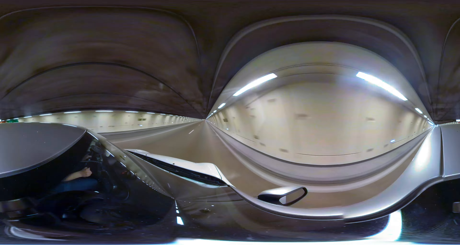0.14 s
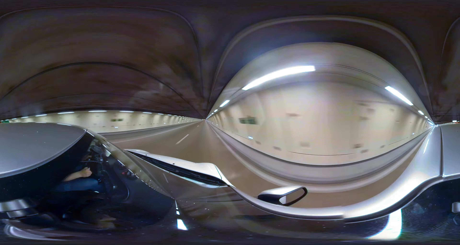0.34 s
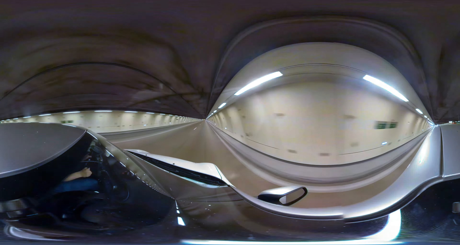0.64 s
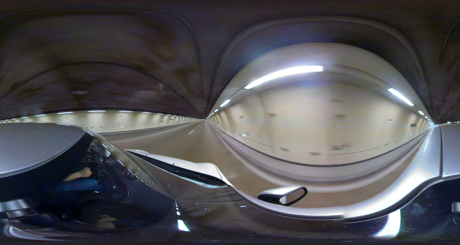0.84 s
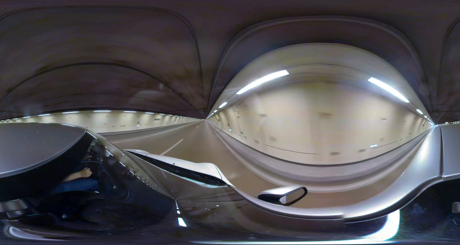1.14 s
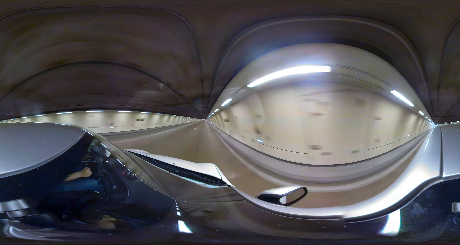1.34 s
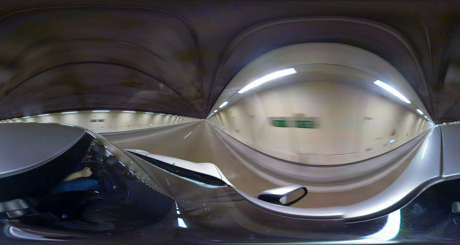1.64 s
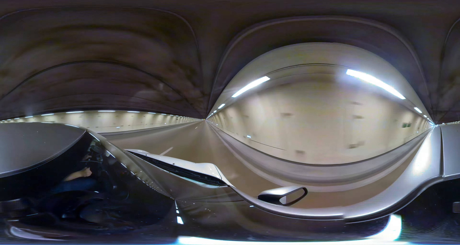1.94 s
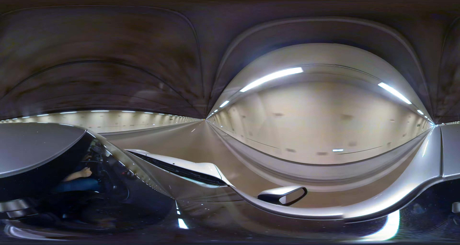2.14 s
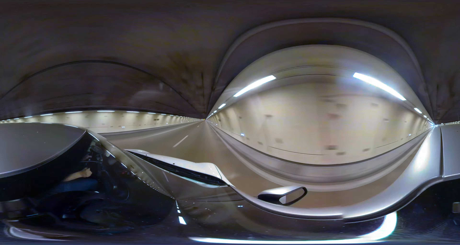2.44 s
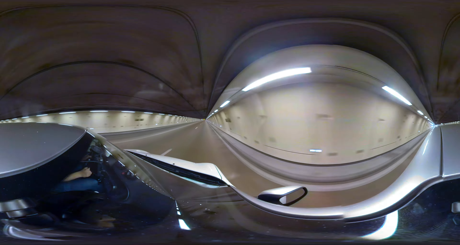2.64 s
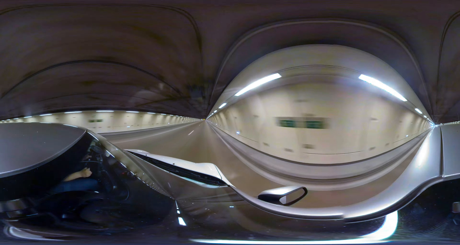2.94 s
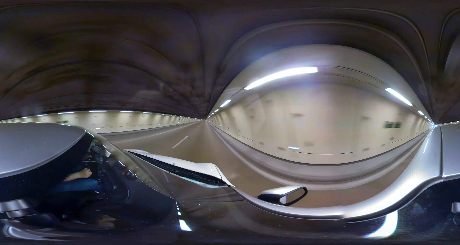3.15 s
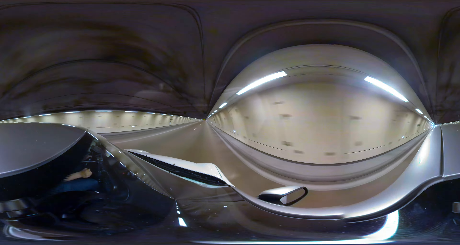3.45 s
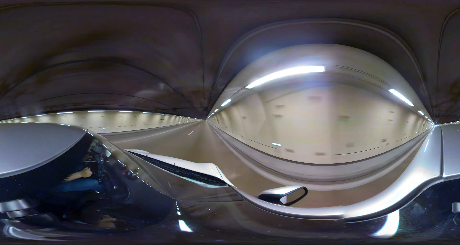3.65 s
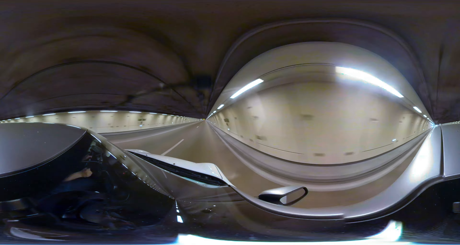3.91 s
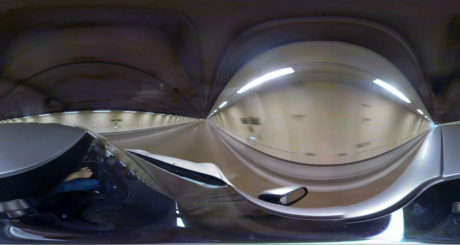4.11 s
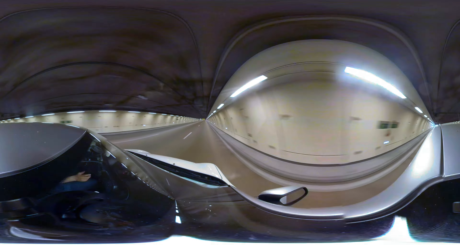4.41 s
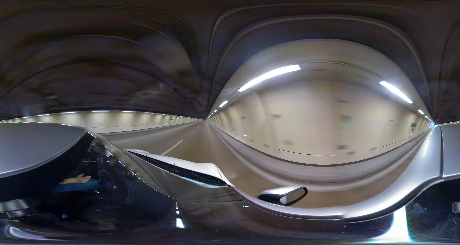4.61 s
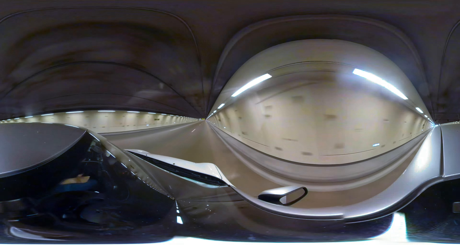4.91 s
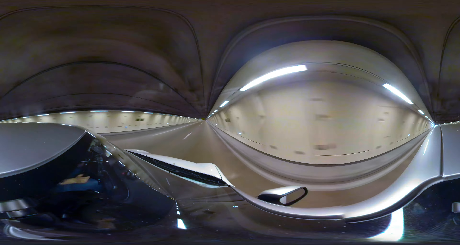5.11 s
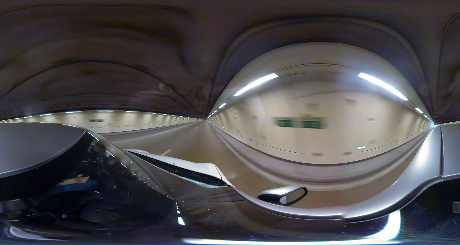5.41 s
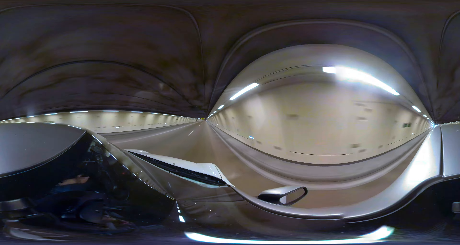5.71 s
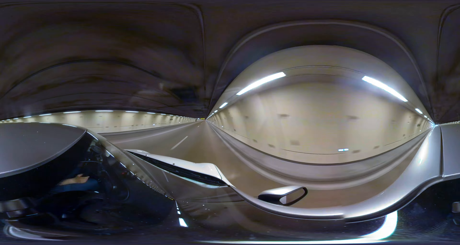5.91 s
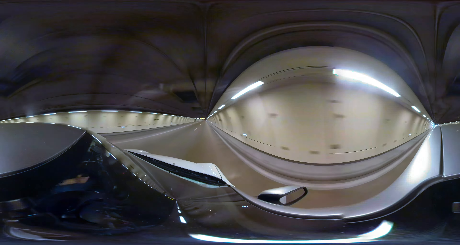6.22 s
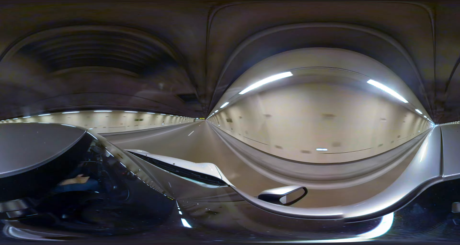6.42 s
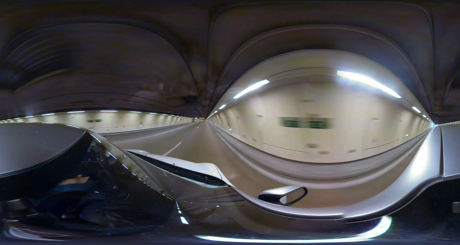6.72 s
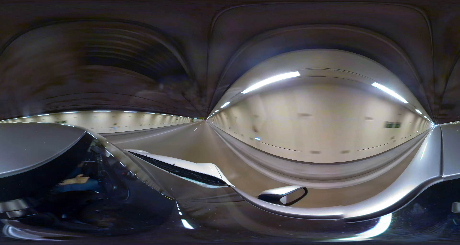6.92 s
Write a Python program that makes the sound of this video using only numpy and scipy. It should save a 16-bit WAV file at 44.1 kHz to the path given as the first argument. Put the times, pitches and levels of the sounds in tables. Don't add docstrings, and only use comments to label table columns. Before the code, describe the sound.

A small camera fixed outside a speeding car in a road tunnel takes heavy, fluttering low wind buffeting throughout. Beneath it are steady tyre roar, rushing air and a faint high whine that comes and goes. The air rush eases after two seconds; towards five the road roughens, with seam thumps, dry knocks and a few sharp grit ticks before an abrupt end.

```python
import sys
import numpy as np
from scipy import signal
from scipy.fft import rfft, irfft, next_fast_len
from scipy.io import wavfile
from scipy.ndimage import uniform_filter1d, map_coordinates

SR = 44100
rng = np.random.default_rng(int(sys.argv[2]) if len(sys.argv) > 2 else 0)


def dump(signal):
    limited = np.clip(np.atleast_2d(signal).T, -1, 1)
    pcm = np.round(limited * 32767).astype(np.int16)
    wavfile.write(sys.argv[1], SR, pcm)


def natural_amplitude(level_db):
    exponent = np.asarray(level_db, float) / 20
    return 10 ** exponent


N = 311346


def unit(x):
    return x / np.sqrt(np.mean(x ** 2) + 1e-20)


def curves(rows):
    s, *cols = np.transpose(rows)
    return [np.interp(np.arange(N) / SR, s, c) for c in cols]


def wobble(rate):
    knots = rng.standard_normal(int(N * rate / SR) + 4)
    return map_coordinates(knots, [np.arange(N) * rate / SR])


def filtered(x, response):
    m = next_fast_len(N + 8192)
    run_on = np.pad(x[:N], 4096, "reflect") * signal.windows.tukey(N + 8192, 8192 / (N + 8192))
    return irfft(rfft(run_on, m) * response(np.fft.rfftfreq(m, 1 / SR)), m)[4096:N + 4096]


def colour(points):
    f, db = np.transpose(points)
    return lambda hz: natural_amplitude(np.interp(np.log(hz + 1), np.log(f + 1), db))


def noise(response, patchy_db):
    z = signal.stft(rng.standard_normal(N + 512), nperseg=512)[2]
    field = uniform_filter1d(rng.standard_normal(z.shape), size=5, axis=0)
    field = uniform_filter1d(field, size=10, axis=1)
    patched = signal.istft(z * natural_amplitude(patchy_db * unit(field)), nperseg=512)[1][:N]
    return unit(filtered(patched, response))


def evened(x, size, depth):
    return unit(x / (np.abs(uniform_filter1d(x ** 2, size=size)) + 0.027) ** depth)


# (start [s], length [s], level [dB])
CRACKLES = [(.24, .04, -94), (.285, .042, -91), (.408, .04, -92), (.608, .038, -93), (1.093, .044, -94),
            (1.44, .04, -94), (1.615, .028, -94), (1.949, .034, -94), (2.03, .045, -93), (2.157, .047, -91),
            (2.472, .032, -92), (2.597, .071, -90), (2.84, .045, -91), (3.099, .063, -92), (3.195, .01, -92),
            (3.245, .05, -89), (3.845, .063, -93), (3.909, .045, -90), (4.035, .08, -92), (4.123, .042, -91),
            (4.347, .031, -93), (4.419, .047, -93), (4.503, .022, -94), (4.552, .044, -92), (4.795, .031, -92),
            (5.002, .037, -93), (5.208, .092, -91), (5.379, .043, -91), (5.462, .05, -92), (5.549, .048, -93),
            (5.723, .047, -93), (6.32, .044, -92), (6.638, .05, -90), (6.958, .049, -89)]


def top_crackle():
    t = np.arange(N) / SR
    ticks_hz, spiky_db, gain_db = 330, 4, 8
    gate = sum(natural_amplitude(db + gain_db) * (t > s) * (t < s + span) for s, span, db in CRACKLES)
    ticks = (rng.random(N) < ticks_hz / SR) * natural_amplitude(spiky_db * rng.standard_normal(N))
    ticks = ticks * np.sign(rng.standard_normal(N))
    return filtered(gate * unit(ticks), colour([(9000, -60), (11500, 0), (15700, -2), (16000, -60)]))


# (frequency [Hz], level [dB rms])
TONES = [(9426, -101), (9803, -92.5), (10180, -90.5), (10928, -95.5)]
# (start [s], length [s], level [dB])
SPELLS = [(0, .25, -70), (.3, .4, -68), (.86, .36, -69), (1.46, .3, -69), (1.76, .88, -67.5),
          (2.92, 0.8, -68.5), (4.1, .35, -69), (4.6, .14, -68.5), (4.8, .16, -70), (5.12, .2, -70),
          (5.44, .07, -68), (5.63, .3, -71), (6.08, .4, -68.5), (6.73, .4, -69)]


def whines():
    t = np.arange(N) / SR
    whine_hz, fade_s, between_db = 4322, 0.02, -78

    def edge(s):
        return 1 / (1 + np.exp(np.clip((s - t) / fade_s, -50, 50)))

    db = between_db + sum((top_db - between_db) * edge(s) * (1 - edge(s + span))
                          for s, span, top_db in SPELLS)
    turn = 2 * np.pi * np.cumsum(whine_hz + 3.8 * wobble(12)) / SR
    level_db = db + .5 + 1.2 * wobble(16) + 2.5 * wobble(35)
    whistle = natural_amplitude(level_db) * (np.sin(turn) + natural_amplitude(1) * np.sin(turn / 2))
    tones = sum(natural_amplitude(level + 3 * wobble(12)) * np.sin(2 * np.pi * np.cumsum(f + 6 * wobble(29)) / SR)
                for f, level in TONES)
    return np.sqrt(2) * (whistle + tones)


# (multiple of the ring [ratio], level [dB])
SHELL = [(.93, 0), (1, 0), (1.08, -2), (1.18, -6), (1.3, -10), (1.45, -18)]
# (time [s], peak level [dB], ring [Hz], t60 [s])
GRIT = [
    (5.2367, -50, 5500, .004),
    (5.3098, -35, 5000, .008),
    (5.6237, -36, 5300, .005),
    (5.6388, -49, 7400, .004),
    (6.1825, -42, 5400, .004),
    (6.3140, -52, 5600, .004),
    (6.5118, -53, 4900, .004),
    (6.967, -46, 6200, .004),
]


def grit():
    out, t = np.zeros(N + 2000), np.arange(2000) / SR
    for s, db, hz, t60 in GRIT:
        ring = sum(natural_amplitude(level) * np.sin(2 * np.pi * k * (hz * t + j * j / 5))
                   for j, (k, level) in enumerate(SHELL))
        crack = 0.15 * rng.standard_normal(len(t))
        out[round(s * SR):][:len(t)] += natural_amplitude(db - 5.0 - 60 * t / t60) * (ring + crack)
    return filtered(out[:N], lambda f: 1 / (1 + (4450 / (f + 1)) ** 20) / (1 + (f / 7600) ** 14))


# (frequency [Hz], level [dB per Hz])
RUSH = [(300, -30.5), (700, -12.5), (1300, 1.5), (1800, 1.5), (2200, -1.5), (3000, -8), (4000, -22),
        (6000, -54.5), (9000, -120)]
HISS = [(1500, -27), (3000, -3), (4000, -2), (5600, -9), (6500, -15.5), (7500, -17.5), (8300, -21.5),
        (9000, -28), (10200, -21.5), (11000, -28), (12000, -37), (12700, -38), (13000, -53.5),
        (16000, -52.5)]
# (time [s], rush level [dB])
AIRFLOW = [(0, -43.5), (.4, -42.5), (1.35, -44.5), (1.7, -41.5), (2.1, -47), (3.66, -47.5), (4.3, -47.5),
           (5.3, -52), (7.06, -48.5)]


def airflow(shared):
    rush_db, = curves(AIRFLOW)
    hiss_db = -58.5 + .05 * (rush_db - rush_db.mean()) + 0.23 * wobble(8.1)
    rush = natural_amplitude(rush_db + 0.82 + 0.27 * shared) * noise(colour(RUSH), patchy_db=0.9)
    return rush + natural_amplitude(hiss_db) * noise(colour(HISS), patchy_db=-1.0)


# (frequency [Hz], level [dB per Hz])
SEAM = [(150, -30.5), (330, 4), (500, 2.5), (900, -6), (1300, -15.5), (2200, -41.5), (4000, -78.5)]
# (time [s], thump level [dB], lift of the tyre roar [dB])
SEAMS = [(0.3, -31, 3.5), (0.87, -27.5, 4.5), (1.06, -24, 1), (1.54, -23, 5), (1.721, -21.5, 0.5),
         (1.9, -19, -0.5), (2.505, -21, 1.5), (2.747, -17, 5), (3.006, -23, -2.5), (3.195, -24, 4.5),
         (3.268, -25, 3.5), (3.53, -28, 1.5), (3.92, -26, 3), (4.15, -29, 2), (4.525, -28, 0.5),
         (4.654, -27, 2), (4.73, -16.5, 2), (5.03, -27, 1), (5.134, -28, 2.5), (5.23, -31, 3.5),
         (5.31, -20.5, 5), (5.514, -31, 2), (5.62, -16.5, 4), (5.81, -27, 2), (6.034, -18, 3.5),
         (6.082, -20, 2.5), (6.242, -15.5, 5.5), (6.41, -23.5, 2), (6.662, -23, 0.5), (6.8, -21, -4)]


def seam_thumps():
    t, length = np.arange(N) / SR, .016
    gate = sum(natural_amplitude(db) * np.exp(-2 * ((t - s - length / 2) / length) ** 2) for s, db, _ in SEAMS)
    return natural_amplitude(-13.5) * gate * noise(colour(SEAM), patchy_db=6.5)


# (time [s], level [dB], surface roughness [0-1])
TYRES = [(0, -38.5, 0.25), (.65, -39, 0), (.9, -37, 0.15), (1.3, -39, 0.08), (1.7, -37.5, 0), (2, -34, 0.3),
         (2.5, -36, 0.48), (2.9, -38, 0.28), (3.3, -37, 0), (3.9, -37.5, 0.22), (4.2, -36, 0.22),
         (4.8, -35.5, 0.6), (5.3, -34, 0.6), (5.6, -36, 0.68), (6.05, -33.5, 0.46), (6.25, -32, 0.44),
         (6.6, -34, 0.63), (7.06, -39, 0)]


def tyre_state():
    t, lift_s = np.arange(N) / SR, 0.022
    tyre_db, rough = curves(TYRES)
    lift_db = sum(db * np.exp(-2 * ((t - s) / lift_s) ** 2) for s, _, db in SEAMS)
    return tyre_db + lift_db, rough


# (frequency [Hz], level [dB per Hz])
DRONE = [(200, -44), (290, 0.5), (340, -2.5), (420, -5.5), (520, -11.5), (650, -22), (1000, -63.5)]


def drone(tyre_db):
    drone_db = -39.8 + 0.47 * (tyre_db - tyre_db.mean()) + wobble(14)
    return natural_amplitude(drone_db) * noise(colour(DRONE), patchy_db=1.4)


# (time [s], peak level [dB], frequency [Hz])
KNOCKS = [(.032, -25, 1020), (1.767, -23, 550), (2.7445, -22, 700), (2.7515, -26, 850), (2.852, -26, 830),
          (3.006, -28, 710), (3.192, -24, 640), (3.5305, -23, 640), (3.572, -25, 740), (4.734, -22, 800),
          (5.522, -23, 860), (6.039, -18, 800), (6.083, -19, 880), (6.251, -14.5, 850), (6.393, -21, 700)]


def knocks():
    t, out, lull = np.arange(N) / SR, np.zeros(N), np.ones(N)
    decay_cycles, gain_db, lull_s = 1.3, 2, .006
    for s, db, hz in KNOCKS:
        span = slice(round((s - .02) * SR), round((s + .02) * SR))
        cycles = np.maximum(t[span] - s, 0) * hz
        out[span] -= natural_amplitude(db + gain_db) * np.exp(-cycles / decay_cycles) * np.sin(2 * np.pi * cycles)
        lull[span] *= 1 - .7 * np.exp(-((t[span] - s + lull_s / 2) / lull_s) ** 2)
    return filtered(out, lambda f: 1 / (1 + (f / 2200) ** 6)), lull


# (time [s], frequency [Hz], peak level [dB])
SLAPS = [(0.889, 521, -33), (2.192, 1400, -35), (2.467, 927, -28), (2.53, 1400, -34), (3.479, 480, -32),
         (4.477, 850, -26), (4.588, 927, -27), (4.662, 1187, -29), (4.918, 854, -29), (5.033, 920, -27.5),
         (5.136, 927, -28), (5.22, 1093, -28), (5.258, 1187, -29), (5.304, 480, -39), (5.305, 1170, -27),
         (5.463, 1007, -27), (5.641, 1180, -29), (5.753, 1187, -30), (5.824, 910, -26), (5.943, 570, -28),
         (6.0, 1300, -31), (6.042, 1187, -37), (6.108, 1007, -27), (6.189, 1007, -27), (6.228, 565, -33),
         (6.26, 900, -28), (6.221, 1000, -25), (6.294, 1007, -27), (6.359, 521, -37), (6.373, 1289, -32),
         (6.416, 1007, -30), (6.527, 1093, -32)]


def slaps():
    t, out, near = np.arange(N) / SR, np.zeros(N), np.zeros(N)
    rise_cycles, fall_cycles, gain_db, dip = 1.1, 2.5, 1.5, 0.32
    for (s, hz, db), phase in zip(SLAPS, rng.random((len(SLAPS), 1))):
        span = slice(max(round((s - .03) * SR), 0), round((s + .04) * SR))
        cycles = (t[span] - s) * hz
        shape = np.exp(-.5 * (cycles / np.where(cycles < 0, rise_cycles, fall_cycles)) ** 2)
        out[span] += natural_amplitude(db + gain_db) * shape * np.sin(2 * np.pi * (cycles + phase))
        near[span] += shape
    return out, 1 - dip * np.clip(near, 0, 1)


def ridge():
    hz = 870 + 70 * wobble(5) + 60 * wobble(60)
    return unit(natural_amplitude(2.7 * wobble(40)) * np.sin(2 * np.pi * np.cumsum(hz) / SR))


# (frequency [Hz], width [Hz], level [dB])
TREAD = [(570, 370, -8.5), (744, 556, 3), (1210, 650, -8.5)]


def tyres(tyre_db, rough, shared):
    def tread(f):
        power = sum(natural_amplitude(2 * db) / (1 + (2 * (f - c) / w) ** 2) ** 2 for c, w, db in TREAD)
        return np.sqrt(power / (1 + (f / 3000) ** 6))

    roar = evened(noise(tread, patchy_db=0.04), size=300, depth=.08)
    coarse = unit(filtered(roar, lambda f: f ** 2 / (f ** 2 + 1600 ** 2)))
    gain = natural_amplitude(tyre_db + 0.46 * shared + 0.15 * wobble(27))
    slap, room = slaps()
    knock, lull = knocks()
    rolling = gain * ((1 - rough) * roar + rough * coarse + natural_amplitude(-14) * ridge())
    return lull * room * rolling + slap + knock


# (time [s], frequency [Hz], peak level [dB])
EDDIES = [(0.279, 185, -17.5), (0.289, 311.7, -24.5), (0.382, 240.6, -18), (0.481, 202.1, -15),
          (0.486, 341, -27.5), (0.63, 305, -24.5), (0.905, 202, -17.5), (0.958, 313, -21),
          (1.055, 341, -21.5), (1.682, 309, -23.5), (1.749, 202.2, -16), (1.756, 345.6, -29),
          (1.867, 283.4, -25.0), (1.888, 199.5, -15), (1.904, 331, -28), (2.296, 185, -14),
          (2.53, 201, -15.5), (2.706, 303.5, -22.5), (2.78, 339, -29.5), (2.915, 343, -31),
          (3.185, 262, -24.5), (3.666, 202, -16), (3.942, 221.4, -19.5), (4.268, 239.5, -21),
          (4.498, 314.7, -25), (4.504, 202.5, -15.5), (4.741, 339, -30), (4.862, 152.5, -15.5),
          (4.895, 170.5, -15), (5.085, 185, -15.5), (5.183, 202, -16.5), (5.207, 284, -24),
          (5.239, 327, -25.5), (5.278, 220.6, -16.5), (5.29, 316, -29), (5.298, 283.6, -23),
          (5.621, 340, -30), (5.642, 316, -23), (5.671, 269, -22), (5.72, 308, -25), (5.951, 340, -27),
          (6.039, 141.2, -14.0), (6.071, 310, -26.5), (6.15, 239, -23), (6.185, 331, -28.0),
          (6.226, 340, -22), (6.286, 187, -14.5), (6.305, 350, -26.5), (6.345, 285, -22.5),
          (6.359, 340, -31), (6.377, 209, -17.5), (6.389, 339, -30), (6.415, 334, -30), (6.435, 185, -18.0),
          (6.442, 313, -26), (6.548, 143, -13.0), (6.723, 318, -27.0), (6.806, 285, -29), (6.814, 285, -26),
          (6.845, 339, -27.5),
          (0.135, 93.6, -13.5), (0.309, 78.2, -12.5), (0.362, 85.6, -16.0), (0.406, 121, -9),
          (0.706, 101, -14), (0.756, 93, -13), (0.811, 101, -17), (0.957, 71, -13), (1.058, 109.4, -10.5),
          (1.132, 85, -14.5), (1.175, 78.8, -16.5), (1.41, 85, -15), (1.723, 92.6, -17), (1.77, 93, -17.5),
          (1.849, 92.8, -18), (2.018, 85, -19), (2.076, 111.3, -15), (2.128, 109.3, -16),
          (2.51, 120, -14.5), (2.621, 120, -8), (2.734, 120, -12), (2.798, 130.5, -12.5),
          (2.861, 94.3, -11.5), (2.894, 101, -14.5), (2.953, 118.3, -14), (3.137, 70.8, -12.5),
          (3.22, 93, -14.5), (3.236, 131, -18), (3.393, 131, -16), (3.55, 93, -10.5), (3.746, 120, -16),
          (3.843, 92.4, -15), (3.942, 92, -12.5), (4.093, 94.2, -15), (4.158, 131, -13.5),
          (4.264, 131, -17.5), (4.492, 85, -17.5), (4.811, 71, -13), (4.971, 131, -15),
          (5.295, 120.3, -9.5), (5.41, 110.8, -16), (5.485, 132.7, -15), (5.779, 132.3, -16.5),
          (6.1, 131, -15.5), (6.2, 84.3, -12.5), (6.263, 92.7, -17), (6.356, 92.5, -20),
          (6.396, 119.8, -13), (6.449, 130.9, -13), (6.452, 93.7, -12.5), (6.51, 132, -16),
          (6.512, 85, -13.5), (6.61, 71, -10), (6.678, 71, -9.5), (6.824, 92.4, -14.5), (6.853, 120, -10),
          (6.905, 101, -10.5), (6.978, 130.6, -11.5), (7.009, 110.6, -13), (7.041, 110.9, -11),
          (0.092, 66.6, -18), (0.175, 30.34, -18.0), (0.272, 55, -16), (0.46, 36.1, -19), (0.619, 59.9, -20),
         (0.792, 32.83, -20), (0.917, 65, -17), (1.635, 46, -18.0), (1.689, 64.4, -17.5),
         (1.744, 39, -15.5), (1.803, 66.3, -18), (1.893, 45.4, -15), (1.964, 40.1, -19),
         (2.069, 49.94, -15.5), (2.185, 50.1, -11.5), (2.313, 46, -17), (2.404, 44.9, -18.0),
         (2.657, 49.6, -12.5), (2.764, 42.9, -14.5), (2.91, 29.8, -19.5), (2.945, 54.2, -12),
         (3.019, 38.4, -18), (3.225, 30.1, -15.5), (3.266, 65, -11), (3.321, 55, -14), (3.421, 49.9, -13),
         (3.593, 55, -19), (3.716, 29.1, -23), (3.81, 50, -16.5), (3.9, 34.64, -17), (4.054, 38.75, -14.5),
         (4.223, 39.45, -20.5), (4.367, 55.5, -17.5), (4.464, 35.53, -14.5), (4.567, 49.76, -15),
         (4.667, 65, -18.5), (4.759, 29.7, -17), (4.82, 36, -15), (5.01, 54.7, -17.5), (5.138, 39, -18.5),
         (5.214, 46.5, -13.5), (5.393, 60, -13), (5.475, 36, -12.5), (5.629, 65.1, -12.5),
         (5.702, 64.6, -15), (5.746, 38.94, -14.5), (5.932, 55.4, -16.5), (6.124, 55.2, -16),
         (6.366, 58.7, -17.5), (6.534, 38.4, -20.0), (6.727, 30, -16.5), (6.741, 55.8, -23),
         (6.794, 55, -15), (6.858, 59.8, -14), (6.937, 38.97, -14.5)]


def vortices():
    t, out, near = np.arange(N) / SR, np.zeros(N), np.zeros((3, N))
    half_length_cycles, gain_db = 1.105, 1
    rows = EDDIES
    for (s, hz, db), phase in zip(rows, rng.random((len(rows), 1))):
        span = slice(max(round((s - 7 / hz) * SR), 0), round((s + 7 / hz) * SR))
        shape = np.exp(-.5 * ((t[span] - s) * hz / half_length_cycles) ** 2)
        out[span] += natural_amplitude(db + gain_db) * shape * np.sin(2 * np.pi * (hz * t[span] + phase))
        near[np.searchsorted([68, 140], hz), span] += shape
    return out, np.clip(near, 0, 1)


# (frequency [Hz], level [dB per Hz])
LARGE = [(5, -19.5), (15, -12), (30, 2), (50, 1), (60, 4.5), (80, -25), (200, -45), (400, -120)]
MIDDLE = [(30, -48), (50, -15.5), (65, -0.5), (100, 0.5), (130, -3.5), (160, -20.5), (300, -56.5),
          (600, -120)]
SMALL = [(70, -53.5), (120, -2), (150, 0.5), (210, -2.5), (260, -8.5), (310, -15.5), (400, -27.5),
         (800, -84)]
# (time [s], strength [dB], eddy size [0-1])
WIND = [(0, -16.5, 0.5), (.4, -17.5, 0.5), (.8, -15.5, 0.6), (1.2, -17, 0.2), (1.55, -17.5, .6),
        (1.8, -15.5, 0.3), (2.2, -15, 0.9), (2.65, -17, 0.6), (3.2, -16.5, 0.7), (3.6, -16.5, 0.6),
        (4.2, -16, 0.8), (4.55, -15, .4), (5.1, -17, 0.5), (5.5, -17, 0.8), (5.9, -16.5, 0.5),
        (6.3, -16, 0.2), (6.7, -14.5, 0.3), (7.06, -19, 0.2)]


def buffet():
    strength_db, bulk = curves(WIND)
    large = evened(noise(colour(LARGE), patchy_db=-1.5), size=1100, depth=0.25)
    middle = evened(noise(colour(MIDDLE), patchy_db=0.26), size=1500, depth=0.22)
    small = evened(noise(colour(SMALL), patchy_db=.5), size=1500, depth=0.22)
    gust = natural_amplitude(wobble(16))
    layers = large, gust * middle, gust * small
    settings = (-4, 4, 0.5), (-5.5, -2, 0.5), (-9, -3.5, 1)
    swing, near = vortices()
    for layer, (db, per_size_db, flutter_db), taken in zip(layers, settings, near):
        gain = natural_amplitude(strength_db + db + per_size_db * (bulk - .5) + flutter_db * wobble(9))
        swing = swing + gain * (1 - 0.52 * taken) * layer
    run_on = np.pad(swing, 4096, "reflect")
    reach = np.abs(signal.hilbert(run_on, next_fast_len(N + 8192))[4096:N + 4096])
    give = (1 + (reach / .415) ** 6) ** (-1 / 6)
    return swing * uniform_filter1d(give, size=200)


def mid_swing(x):
    near = np.exp(-(np.arange(N) / SR / .004) ** 2)
    return x + (-.1 - x[0]) * near + (-.21 - x[-1]) * near[::-1]


def scene():
    shared = wobble(8.2)
    tyre_db, rough = tyre_state()
    road = airflow(shared) + drone(tyre_db) + tyres(tyre_db, rough, shared)
    mix = mid_swing(whines() + grit() + seam_thumps() + road + buffet())
    below_edge = filtered(mix, colour([(11100, 0), (11300, -60)]))
    edge_band = colour([(11000, -60), (11200, 0), (12000, -1), (12700, -4), (12950, -45)])
    flicker = unit(natural_amplitude(7 * np.tanh(2 * wobble(40))))
    return (below_edge + 0.8 * flicker * filtered(mix, edge_band) + top_crackle())[None]


def top_cut(x):
    return signal.sosfilt(signal.butter(12, 15700, fs=SR, output="sos"), x)


def record(dry):
    return top_cut(dry)


dry = scene()
out = record(dry)
dump(out)
```